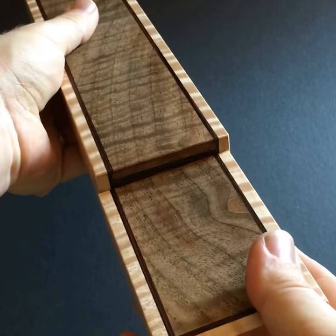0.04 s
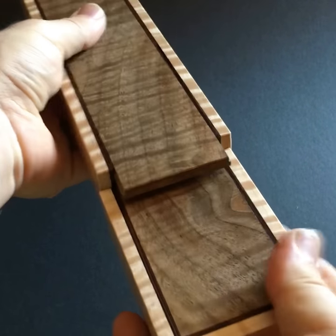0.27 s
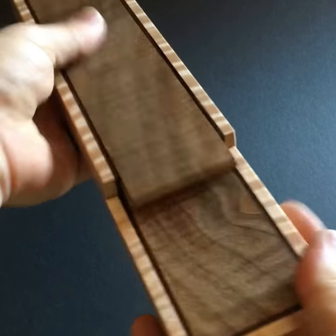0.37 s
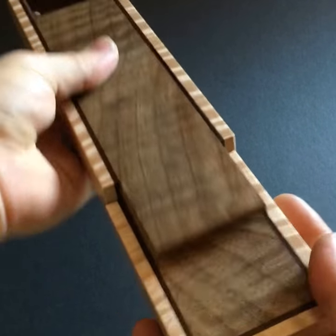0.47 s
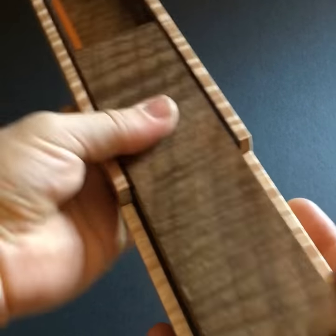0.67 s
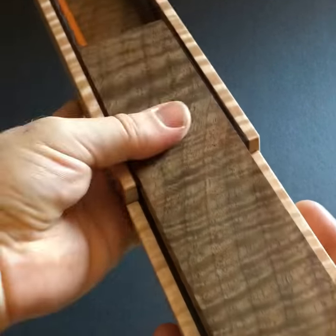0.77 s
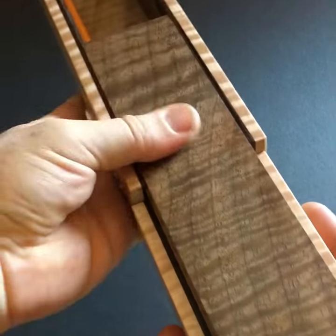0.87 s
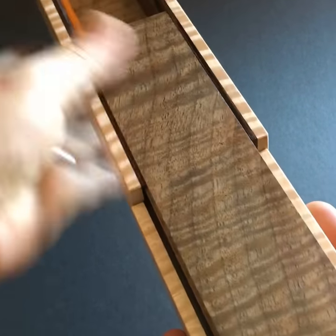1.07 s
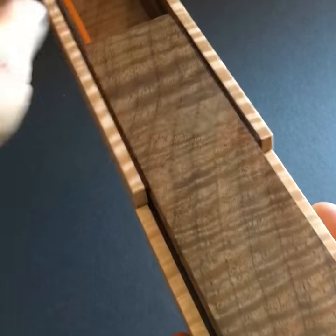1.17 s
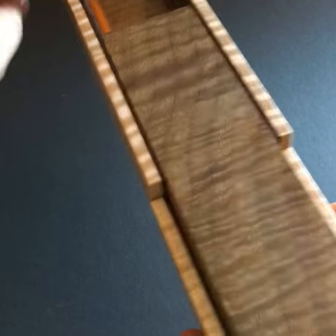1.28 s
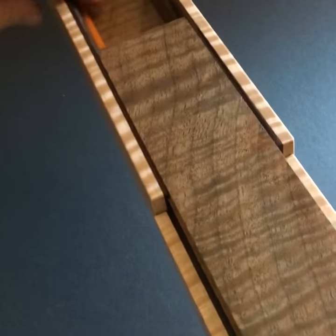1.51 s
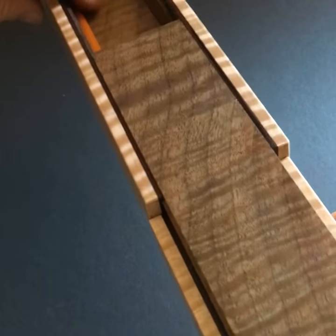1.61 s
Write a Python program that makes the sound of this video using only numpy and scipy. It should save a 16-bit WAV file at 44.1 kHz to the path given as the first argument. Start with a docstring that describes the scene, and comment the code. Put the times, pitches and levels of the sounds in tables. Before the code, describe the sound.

A wooden box panel scrapes along its grooves, followed by a sharp tap and faint clicks.

```python
"""A thumb nudges a wooden panel of a puzzle box, then pushes it along its grooves, close by.
Wood rubbing on wood makes the box ring. Its hollow changes pitch as the panel moves, and the
panel bumps in its frame. Fingers brush the wood and loose parts tick, mostly after the slide,
and one taps sharply. A low hum fills the small, quiet room."""
import sys
import numpy as np
from scipy import signal
from scipy.fft import rfft, irfft, next_fast_len
from scipy.io import wavfile
from scipy.ndimage import map_coordinates

SR = 44100
rng = np.random.default_rng(int(sys.argv[2]) if len(sys.argv) > 2 else 0)


def dump_mix(stems):
    """Bounce the given channels to the path in sys.argv[1] as a 16-bit WAV at rate SR."""
    frames = np.atleast_2d(stems).T  # one column per channel
    limited = np.clip(frames, -1, 1)  # hard clip at full scale
    pcm = np.round(limited * 32767).astype(np.int16)
    wavfile.write(sys.argv[1], SR, pcm)


N = 72765


def amp(db):
    """Turn decibels (dB) into a number to multiply a sound by."""
    return 10 ** (np.asarray(db) / 20)


def unit(x):
    """Scale a sound to an average (rms) level of 1."""
    return x / np.sqrt(np.mean(x ** 2) + 1e-20)


def clock():
    """The time of each sample, in seconds."""
    return np.arange(N) / SR


def along(points, hz):
    """Read a curve of (Hz, value) points, with the octaves evenly spaced."""
    pitches, values = np.transpose(points)
    return np.interp(np.log(hz + 1), np.log(pitches + 1), values)


def wobble(rate):
    """A smooth curve through `rate` random values a second."""
    return map_coordinates(rng.standard_normal(4096), [clock() * rate], mode="wrap")


def filtered(x, response):
    """Make each frequency louder or softer by the gain response(hz)."""
    size = next_fast_len(N + SR // 2)
    return irfft(rfft(x, size) * response(np.fft.rfftfreq(size, 1 / SR)), size)[:N]


def noise(spectrum):
    """Noise of level 1, shaped by (Hz, dB) points."""
    return unit(filtered(rng.standard_normal(N), lambda hz: amp(along(spectrum, hz))))


def band(hz, lo, hi, order=12):
    """A gain that lets through lo to hi Hz, with soft edges."""
    return ((1 + (lo / (hz + 1)) ** order) * (1 + (hz / hi) ** order)) ** -.5


def swell(start, length, rise, fall):
    """Fade in, hold and fade out; all times are in seconds."""
    t = clock() - start
    return np.clip(np.minimum(t / rise, (length - t) / fall), 0, 1)


def background():
    """Faint room noise and a low, wavering hum."""
    # Each row: frequency in Hz, relative level in dB.
    noise_shape = [(25, -33), (55, 1), (85, -10.5), (340, -19.5), (620, -27.5), (1300, -29.5),
                   (16000, -44.5)]
    # Each row: pitch in Hz, level in dB.
    hum_tones = [(57.5, -62.5), (116, -71.5)]
    hum = np.zeros(N)
    for hz, db in hum_tones:
        level = amp(db + .8 * wobble(rate=9))
        hum += level * unit(np.sin(2 * np.pi * hz * clock() + .3 * wobble(rate=9)))
    return hum + amp(-62.5) * noise(noise_shape)


def room(x):
    """The small room adds a short echo whose treble dies first."""
    # Each row: frequency in Hz, seconds to fade by 60 dB.
    fade_times = [(200, 0.38), (1500, 0.22), (5500, 0.11), (12000, 0.065)]
    hz, t, spectrum = signal.stft(rng.standard_normal(SR // 2), SR, nperseg=256)
    fade = amp(-60 * t / along(fade_times, hz)[:, None])
    echo = signal.istft(spectrum * fade, SR, nperseg=256)[1]
    return signal.fftconvolve(x, echo / np.linalg.norm(echo))[:N]


def brushes():
    """Skin brushes the wood with short, light hisses as the fingers change grip."""
    # Each row: start in seconds, length in seconds, level in dB.
    touches = [(0.109, 0.068, -65.5), (0.295, 0.02, -54), (0.321, 0.075, -57.5), (0.902, 0.095, -57.5),
               (1.181, 0.025, -54.5), (1.259, 0.027, -65), (1.508, 0.099, -66)]
    # Each row: frequency in Hz, relative level in dB.
    skin_hiss = [(500, -20.5), (2900, -0.5), (4800, -6), (6200, -3.5), (7100, 4), (8300, -6), (9700, 1.5),
                 (10800, -8), (16000, -7.5)]
    loudness = sum(amp(db) * swell(start, length, rise=0.44 * length, fall=0.49 * length)
                   for start, length, db in touches)
    return noise(skin_hiss) * loudness


def clicks():
    """Wood hits wood: a crack, a clack, and panel tones that the hand damps to a faint, rough ring."""
    # Each row: start in seconds, overall gain in dB, favoured pitch in Hz, ring gain in dB,
    # gain of crack and clack in dB, treble limit in Hz.
    contacts = [(0.2969, -47, 2900, -21, 9, 14200), (0.3429, -52, 1270, 7, 2, 9000),
                (0.7916, -28.5, 3550, -11.5, -7, 15300), (0.9252, -52.5, 3400, -5, 7, 9000),
                (1.0371, -52, 4900, -17, 8, 15000), (1.1062, -40.5, 1600, -1, -0.5, 11200),
                (1.233, -57, 1980, 3.5, 7, 9050), (1.4918, -41.5, 2460, 5.5, -4, 6000),
                (1.4953, -31, 3900, -6, 7.5, 7640), (1.55, -42, 2320, 0.5, 1, 8000)]
    # Each row: pitch in Hz, relative levels in dB of the first snap and of the lasting ring,
    # seconds for the ring to fade by 60 dB.
    panel_tones = [(1351, -19, -7.5, 0.065), (1720, -3.5, -12.5, 0.13), (2370, -6, -7.5, 0.073),
                   (2776, -12, -10, 0.046), (2988, 3, -28, 0.049), (4017, -2.5, -29.5, 0.19),
                   (5320, -10, -7, 0.016), (6960, -10.5, -10, 0.015)]
    # Each row: frequency in Hz, relative level in dB.
    crack_shape = [(300, -7.5), (900, -4.5), (1600, 1), (4300, 0), (7500, -4), (10000, -9.5)]
    snap_s, crack_s, clack_s = 0.013, 0.015, 0.089  # times to fade by 60 dB
    rise_s, db_per_octave = 0.00071, -3
    out = np.zeros(N)
    for start, db, pitch_hz, ring_db, crack_db, top_hz in contacts:
        t = np.maximum(clock() - start, 0)
        # The box has so many tones close together that they sound like noise.
        clack = unit(filtered(rng.standard_normal(N), lambda hz: band(hz, 1580, 2940)))
        crack = noise(crack_shape) * amp(-60 * t / crack_s)
        hit = amp(crack_db) * (crack + clack * amp(-18 - 60 * t / clack_s))
        for tone_hz, snap_db, lasting_db, ring_s in panel_tones:
            phase = 2 * np.pi * (tone_hz * t + rng.random())
            hit += amp(snap_db - 60 * t / snap_s) * np.sin(phase)
            rough_ring = np.sin(phase + 1.2 * wobble(rate=130))
            hit += amp(ring_db + lasting_db - 60 * t / ring_s) * rough_ring
        hit *= 1 - np.exp(-t / rise_s)
        octaves_away = lambda hz: abs(np.log2((hz + 1) / pitch_hz))
        colour = lambda hz: amp(db_per_octave * octaves_away(hz)) * band(hz, 0, top_hz)
        out += amp(db) * filtered(hit, colour)
    return out


def bumps():
    """A soft knock bends the panel: high waves arrive first, then a few low ones and a faint boom."""
    # Each row: start in seconds, level in dB, opening pitch in Hz (higher for a harder knock).
    knocks = [(0.3, -48.5, 620), (.333, -49, 594), (0.573, -37.5, 1496), (.614, -38.5, 1340),
              (.677, -34.5, 3030), (0.6821, -33.5, 1837), (0.7122, -43, 690), (0.8261, -43.5, 550),
              (0.8485, -43.5, 1210)]
    low_hz, drop_s, peak_s, boom_s = 321, 0.00136, 0.0016, 0.096
    out = np.zeros(N)
    for start, db, start_hz in knocks:
        t = np.maximum(clock() - start, 0)
        cycles = low_hz * t + (start_hz - low_hz) * drop_s * (1 - np.exp(-t / drop_s))
        knock = t / peak_s * np.exp(1 - t / peak_s) * np.sin(2 * np.pi * cycles)
        boom = unit(filtered(rng.standard_normal(N), lambda hz: band(hz, 200, 420)))
        boom *= (t > 0) * amp(-13 - 60 * t / boom_s)
        out += amp(db) * (knock + boom)
    return out


def glides():
    """Rough tones of the panel and the hollow under it change pitch as the panel slides."""
    # Each row: start in seconds, length in seconds, first pitch in Hz, last pitch in Hz, level in dB.
    sliding_tones = [(.207, 0.03, 699, 990, -43), (0.209, 0.03, 275, 302, -55),
                     (0.232, 0.032, 1592, 1540, -43), (0.232, 0.043, 1008, 1000, -57),
                     (0.392, 0.031, 373.4, 400, -51.5), (0.398, 0.0404, 1618, 1252, -37),
                     (0.413, 0.088, 936, 537, -63), (0.529, 0.0364, 1500, 1390, -41.5),
                     (0.532, 0.053, 2226, 2010, -38), (0.555, 0.061, 5950, 5790, -36),
                     (0.661, 0.027, 3280, 2937, -31)]
    roughness, flutter_rate, fade_s = 0.66, 240, 0.0036
    out = np.zeros(N)
    for start, length, from_hz, to_hz, db in sliding_tones:
        hz = np.interp(clock(), [start, start + length], [from_hz, to_hz])
        phase = 2 * np.pi * np.cumsum(hz) / SR
        flutter = wobble(flutter_rate) * np.sin(phase) + wobble(flutter_rate) * np.cos(phase)
        tone = unit(np.sin(phase) + roughness * flutter)
        out += amp(db) * tone * swell(start, length, fade_s, fade_s)
    return out


def moving_contact(x):
    """Narrow bands of the rubbing sound swell and fade as the touching spots travel."""
    depth_db, width_hz, life_s = 3.5, 189.2, 0.03003
    hz, t, spectrum = signal.stft(x, SR, nperseg=512)
    grid = np.meshgrid(hz / width_hz, t / life_s, indexing="ij")
    patches = map_coordinates(rng.standard_normal((256, 256)), grid, mode="wrap")
    return signal.istft(spectrum * amp(depth_db * patches), SR, nperseg=512)[1][:N]


def scrape():
    """Countless tiny slips of wood on wood ring the box, in a short nudge and a longer push."""
    # Each row of both: time in seconds, relative levels in dB of the middle and of the treble.
    nudge = [(0.201, -49, -61), (0.208, -34.5, -39), (0.241, -39, -35), (0.276, -51, -68), (0.29, -52, -62)]
    push = [(0.394, -52.5, -63), (0.403, -33.5, -32), (0.425, -32.5, -32.5), (0.438, -39, -39),
            (0.524, -37, -39), (0.537, -32.5, -36.5), (0.569, -36.5, -32), (0.582, -40, -37),
            (0.61, -34, -32.5), (0.626, -43, -40), (0.635, -38, -33.5), (0.682, -31, -31.5),
            (0.704, -46.5, -54), (0.716, -41.5, -46), (0.76, -64.5, -74.5)]
    # Each row: frequency in Hz, relative level in dB.
    rub_shape = [(300, -9.5), (550, -9.5), (950, -2), (1250, 7), (1850, 3), (2300, 1), (2600, 3), (3150, 2),
                 (4100, -7), (4750, -7), (5300, 1.5), (6100, 1.5), (6900, -1), (8600, -10), (9600, -5.5),
                 (10400, -14), (16000, -22)]
    # Each row: pitch the box rings at in Hz, width in Hz, level in dB relative to the plain rub.
    box_tones = [(1606, 68, -3.5), (2283, 130, 3.5), (2990, 80, 1), (3830, 150, 3), (5800, 47, -10)]
    slips_per_s, judder_db, low_hz, split_hz = 8000, .85, 232, 4190
    slips = (rng.random(N) < slips_per_s / SR) * rng.standard_normal(N)
    friction = rng.standard_normal(N) + amp(-5.5) * unit(slips)
    friction *= amp(judder_db * wobble(rate=220))
    ringing = lambda hz: sum(amp(db) * 1j * hz * width / (pitch ** 2 - hz ** 2 + 1j * hz * width)
                             for pitch, width, db in box_tones)
    colour = lambda hz: amp(along(rub_shape, hz)) * (1 + ringing(hz))
    wood = moving_contact(filtered(friction, colour))
    middle = filtered(wood, lambda hz: band(hz, low_hz, split_hz))
    treble = filtered(wood, lambda hz: band(hz, split_hz, SR))
    out = np.zeros(N)
    for stroke in (nudge, push):
        times, middle_db, treble_db = np.transpose(stroke)
        for part, db in ((middle, middle_db - 2.5), (treble, treble_db - 1.44)):
            out += unit(part) * amp(np.interp(clock(), times, db, left=-np.inf, right=-np.inf))
    return out


def scene():
    """The box in the hands and the room around it, in one channel."""
    box = scrape() + glides() + bumps() + clicks() + brushes()
    return (box + amp(-13.5) * room(box) + background())[None]


def record(dry):
    """Cut off the very highest treble."""
    return np.array([filtered(channel, lambda hz: hz < 16100) for channel in dry])


dry = scene()
out = record(dry)
dump_mix(out)
```